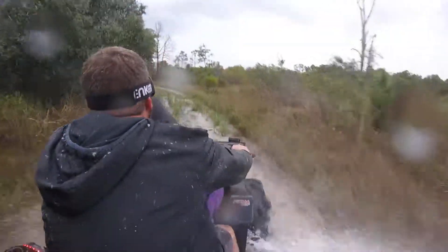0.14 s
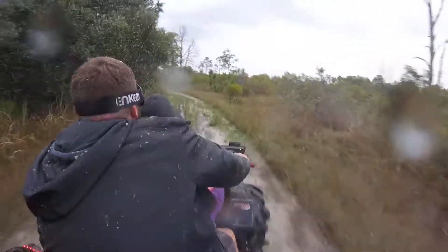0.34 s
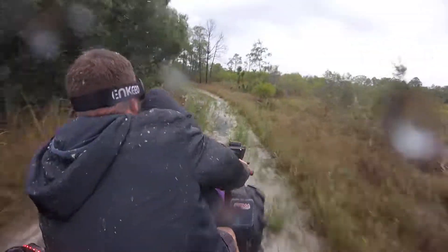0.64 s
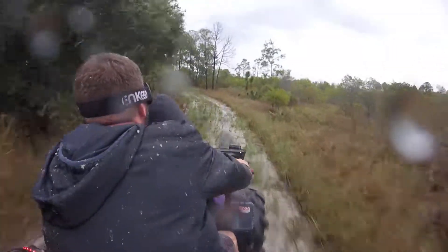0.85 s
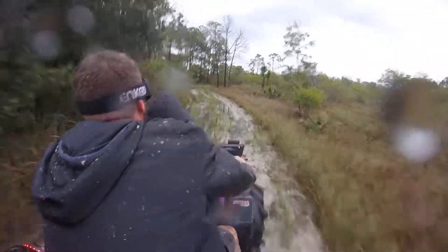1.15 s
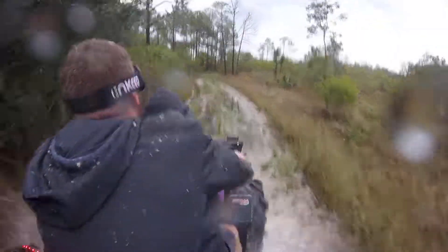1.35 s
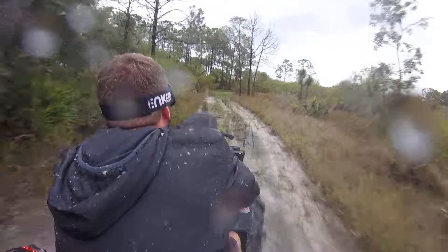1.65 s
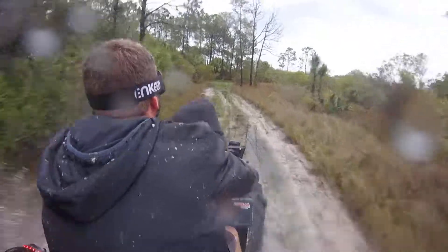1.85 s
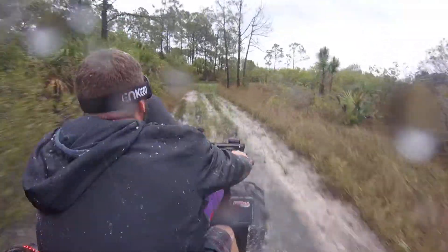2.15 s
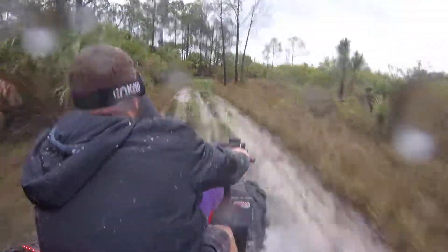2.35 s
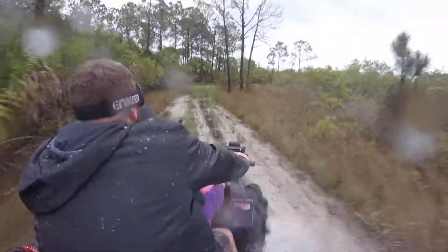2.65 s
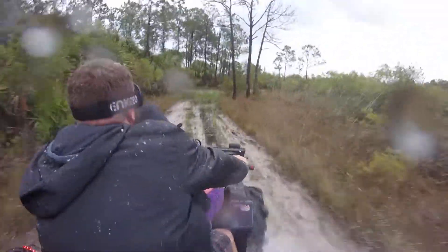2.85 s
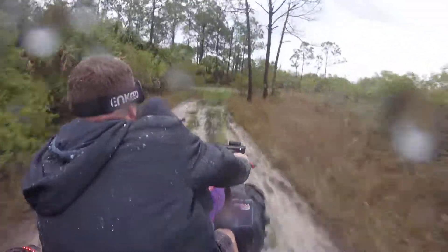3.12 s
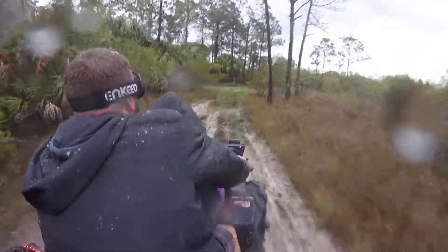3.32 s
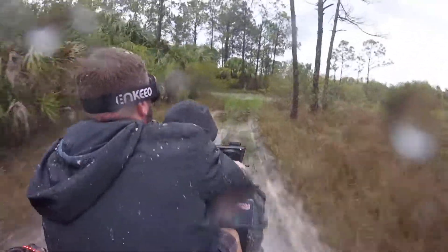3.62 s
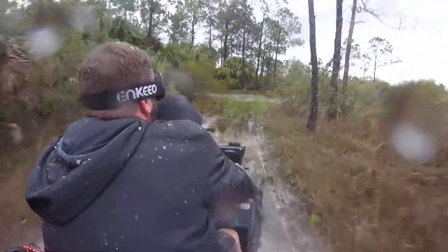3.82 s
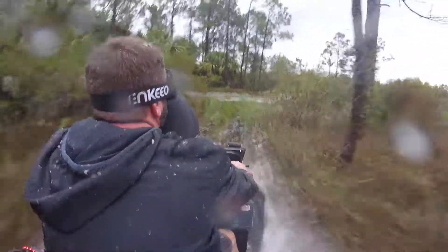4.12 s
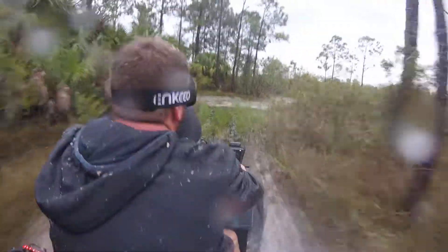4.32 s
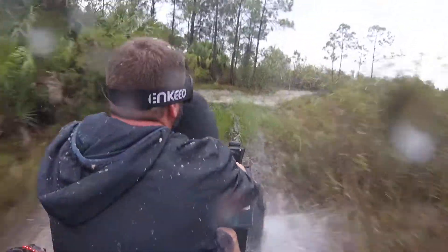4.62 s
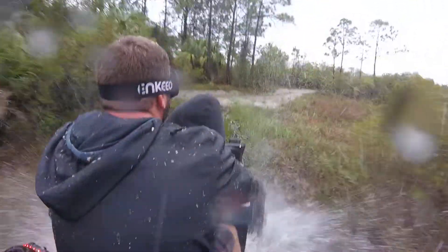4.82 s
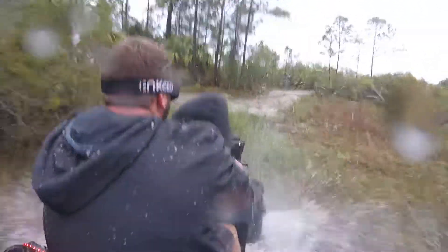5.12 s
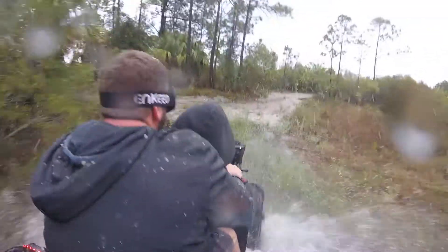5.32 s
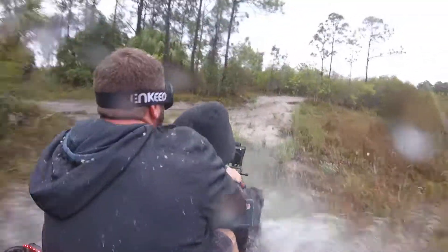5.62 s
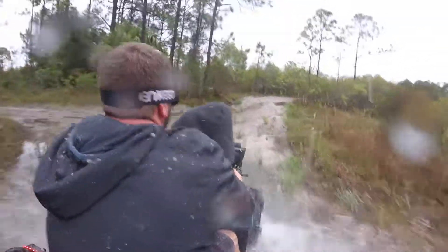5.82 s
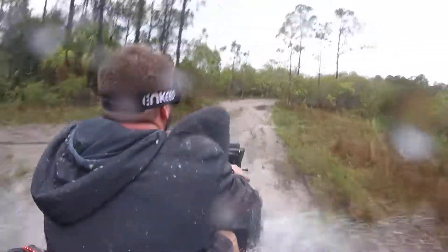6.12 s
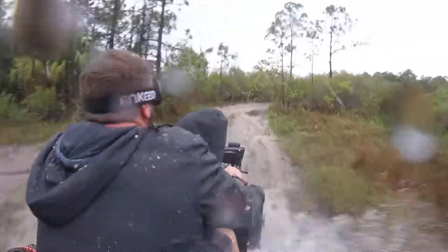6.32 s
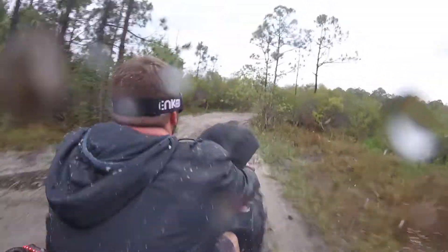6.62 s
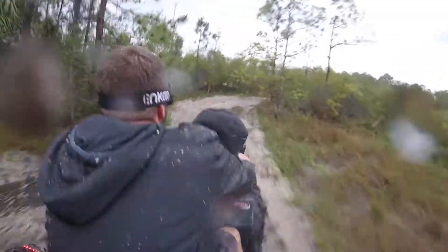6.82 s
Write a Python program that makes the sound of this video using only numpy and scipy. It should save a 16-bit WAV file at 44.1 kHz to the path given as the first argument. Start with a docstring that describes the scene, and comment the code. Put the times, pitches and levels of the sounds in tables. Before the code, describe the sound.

A one-cylinder quad bike drives along a flooded track, heard close up from its rear. The exhaust barks and booms with each press of the throttle, over rattling parts, rumbling panels and a light hiss of spray. Wind buffets the microphone throughout, while drops tick and mud thuds. Midway the engine sags twice, with faint belt chirps, two exhaust pops and a clink, then revs up again.

```python
"""A quad bike with a one-cylinder four-stroke engine on a flooded sand track, heard from its rear rack.
From the start the exhaust barks and booms, panels rumble and tyres spray, all louder with each press of
the throttle, while the transmission rattles and wind buffets the camera. Soon drops tick on its housing,
mud slaps the panels and the treble crackles. After 3 s the engine slows and its slack belt chirps.
Near 4.2 s the bike runs into deep water; the exhaust pops twice; the belt snatches as the engine revs."""
import sys
import numpy as np
from scipy import signal
from scipy.fft import rfft, irfft, next_fast_len
from scipy.io import wavfile
from scipy.ndimage import uniform_filter1d, map_coordinates

SR = 44100
rng = np.random.default_rng(int(sys.argv[2]) if len(sys.argv) > 2 else 0)


def wav_out(sig):
    """Save sig, one row per channel (or a flat mono array), as 16-bit PCM at SR to the path in sys.argv[1]."""
    wavfile.write(sys.argv[1], SR, np.round(np.clip(np.atleast_2d(sig).T, -1, 1) * 32767).astype(np.int16))


N = 306936
T = np.arange(N) / SR


def undb(db):
    """Turn decibels into a number to multiply by."""
    return 10 ** (np.asarray(db) / 20)


def unit(x):
    """Scale a sound to an average strength (rms) of 1."""
    return x / np.sqrt(np.mean(x ** 2))


def noise():
    """White noise: an even hiss."""
    return rng.standard_normal(N)


def wander(per_s):
    """A smooth random drift with a spread of 1."""
    hold = int(SR / per_s)
    steps = np.repeat(rng.standard_normal(N // hold + 1), hold)
    return unit(uniform_filter1d(uniform_filter1d(steps, hold), hold)[:N])


def swells(rows, rise_s, fall_s):
    """A level in dB that rests at 0, moves to each row's level while it lasts, and falls back."""
    gain = np.ones(N)
    for start, end, db in rows:
        rise = 1 - np.exp(-np.clip(T - start, 0, end - start) / rise_s)
        fall = np.exp(-np.maximum(T - end, 0) / fall_s)
        gain += (undb(db) - 1) * rise * fall
    return 20 * np.log10(np.maximum(gain, 1e-3))


def keep_band(x, hz, kind, order=2):
    """Keep what is below ("low") or above ("high") a frequency; a higher order cuts more sharply."""
    return signal.sosfilt(signal.butter(order, hz, kind, fs=SR, output="sos"), x)


def colour(x, spectrum):
    """Make each frequency louder or softer, following a table."""
    hz, db = np.transpose(spectrum)
    f = np.maximum(np.fft.rfftfreq(N, 1 / SR), 1)
    return irfft(rfft(x) * undb(np.interp(np.log(f), np.log(hz), db)), N)


def ring(x, modes):
    """Make an object ring at its own notes (modes); narrower ones ring longer."""
    s = 1j * np.fft.rfftfreq(16384, 1 / SR)
    # neighbouring notes swing in opposite directions
    gain = sum((-1) ** k * undb(db) * s * width / (s * s + s * width + hz * hz)
               for k, (hz, width, db) in enumerate(modes))
    # minimum phase: all notes start together at the push
    cepstrum = irfft(np.log(np.abs(gain) + 1e-4))
    half = len(cepstrum) // 2
    folded = np.r_[cepstrum[0], 2 * cepstrum[1:half]]
    response = irfft(np.exp(rfft(folded, 2 * half)))[:half]
    size = 2 * next_fast_len((N + SR // 2) // 2)
    return irfft(rfft(x, size) * rfft(response, size), size)[:N]


def drifting_ring(x, modes, spread, per_s):
    """Ringing that wanders between a slightly lower and a slightly higher tuning."""
    low, high = (ring(x, np.array(modes) * [1 + side * spread / 2, 1, 1]) for side in (-1, 1))
    blend = .5 + .5 * np.tanh(wander(per_s))
    return (1 - blend) * low + blend * high


def echo(x, echoes):
    """Repeating echoes that spread a pulse in time and leave its tone alone."""
    f = np.fft.rfftfreq(N, 1 / SR)
    spectrum = rfft(x)
    for delay_s, share in echoes:
        lag = np.exp(-2j * np.pi * f * delay_s)
        direct = np.sqrt(1 - share)
        spectrum = spectrum * (direct + lag) / (1 + direct * lag)
    return irfft(spectrum, N)


def clicks(times, sizes):
    """One click at each time."""
    x = np.zeros(N)
    np.add.at(x, np.clip((times * SR).astype(int), 0, N - 1), sizes)
    return x


def burst(pulses, fade_s):
    """Noise that starts at each pulse and dies away."""
    return noise() * signal.lfilter([1], [1, -np.exp(-1 / (SR * fade_s))], pulses)


def blows(times, peaks_db, modes, fade_s, scrape, pitch=1):
    """Each blow is a push and a short noisy scrape that make an object ring."""
    out = np.zeros(N)
    response = ring(np.r_[1, np.zeros(N - 1)], modes)[:SR // 8]
    age = T[:SR // 4]
    for time, db, fade, ratio in np.broadcast(times, peaks_db, fade_s, pitch):
        force = scrape * rng.standard_normal(len(age)) * np.exp(-age / fade)
        force[0] += 1
        retuned = map_coordinates(response, [ratio * np.arange(len(response))])
        start = int(time * SR)
        hit = signal.fftconvolve(force, retuned)[:N - start]
        out[start:start + len(hit)] += hit * undb(db) / np.abs(hit).max()
    return out


# engine speed, cruising, then sagging twice and revving: (time [s], firings a second [Hz])
ENGINE_SPEED = [(0, 45.89), (.2, 45.36), (.29, 47.02), (.39, 44.66), (.5, 46), (.65, 45.02), (.76, 47.98),
                (.84, 46.54), (.93, 47.52), (1.03, 46.77), (1.14, 48), (1.2, 47.7), (1.28, 49.05),
                (1.42, 48.08), (1.52, 49.97), (1.7, 49.53), (1.78, 48.54), (1.88, 49.21), (2.06, 48.7),
                (2.17, 47.07), (2.28, 47.85), (2.39, 46.46), (2.48, 46.43), (2.55, 45.96), (2.65, 46.35),
                (2.77, 43.93), (2.85, 46.75), (2.97, 45.39), (3.17, 45.7), (3.28, 39.6), (3.46, 35.4),
                (3.52, 37.6), (3.64, 44.83), (3.79, 43.14), (3.97, 42.56), (4.26, 37.75), (4.5, 36.6),
                (4.63, 49.1), (4.85, 46), (4.94, 51.6), (5.05, 49.3), (5.14, 44.5), (5.29, 47.23),
                (5.41, 48.76), (5.55, 49.72), (5.68, 51.81), (5.82, 50.13), (5.93, 52.64), (6.07, 51.1),
                (6.21, 53.11), (6.29, 51.63), (6.52, 52.99), (6.7, 51.34), (6.81, 53.01), (6.96, 50.38)]
def firing_times():
    """The moments when the exhaust valve opens, once every two turns of the engine."""
    speed_hz = np.interp(T, *np.transpose(ENGINE_SPEED))
    cycles = .555 + np.cumsum(speed_hz) / SR  # starts partway through a cycle
    return np.interp(np.arange(1, int(cycles[-1]) + 1), cycles, T)


def firings(scatter_db, jitter_s):
    """One pulse for each firing, each a little different in strength and timing."""
    times = firing_times()
    size, slip = rng.standard_normal((N // 500, 2))[:len(times)].T
    return clicks(times + jitter_s * slip, undb(scatter_db * size))


# presses of the thumb throttle: (start [s], end [s], load above a closed throttle [dB])
THROTTLE_PRESSES = [(.02, .17, 13), (.21, .73, 17), (.76, .82, 13.5), (.82, .96, 18), (1.01, 1.25, 16),
                    (1.33, 1.47, 5), (1.64, 1.69, 8), (1.69, 1.91, 17), (1.98, 2.17, 16), (2.24, 2.46, 14),
                    (2.52, 2.68, 9.5), (2.7, 2.84, 14.5), (2.87, 2.95, 9.5), (2.95, 3.15, 15),
                    (3.5, 3.58, 17), (3.58, 3.78, 16.5), (3.81, 3.95, 15.5), (4.52, 4.61, 15),
                    (4.85, 4.98, 15.5), (5.03, 5.12, 7), (5.22, 5.29, 9.5), (5.3, 5.68, 14.5),
                    (5.73, 5.99, 14.5), (6.08, 6.23, 14), (6.3, 6.46, 12.5), (6.62, 6.92, 11)]
def throttle():
    """The load, or how hard the engine works, in dB: it builds with each press and then dies away."""
    return swells(THROTTLE_PRESSES, rise_s=.022, fall_s=.039)


# the pulse bounces between the pipe's bends: (delay [s], share sent back [0 to 1])
BEND_ECHOES = [(.00062, 0.11), (.0021, 0.25), (.0047, 0.12)]
# notes of the exhaust pipe: (pitch [Hz], width [Hz], level [dB])
PIPE_NOTES = [(415, 57, 4), (432.8, 89, 2.5), (591.6, 12, -5), (652.8, 19.8, -1.5), (717.3, 56.6, -3.5),
              (838.6, 24, -5), (990, 51.4, -6.5), (1126, 34, -9), (1250, 21, 0), (1424, 154, -3.5),
              (1610, 76, -1), (1671, 107, -5.5), (1830, 140, -6.5), (1957, 54, -1.5), (2196, 180, -4),
              (2478, 260, -6.5), (2536, 116, -5.5), (2800, 46, -12), (3165, 220, -13), (3460, 110, -10),
              (3880, 60, -31), (4000, 180, -21), (4600, 1500, -40), (5770, 130, -29), (5470, 300, -38)]
def pipe_bark(pulses, gas_pulses):
    """The valve opens with a crack and gas rushes after it; both make the pipe ring."""
    gas = keep_band(unit(burst(gas_pulses, fade_s=.0058)), 690, "high", order=1)
    crack = keep_band(unit(echo(pulses, BEND_ECHOES)), 870, "low", order=1)
    force = keep_band(crack, 3000, "low", order=3) + undb(-6.5) * gas
    pipe = drifting_ring(force, PIPE_NOTES, spread=.0076, per_s=6)  # the gas's heat shifts the notes
    return unit(keep_band(pipe, 370, "high", order=4))


# notes of the valve gear: (pitch [Hz], width [Hz], level [dB])
VALVE_NOTES = [(3060, 410, 3.5), (5540, 720, -20.5)]
def valve_tick(pulses):
    """The parts that move the valve tick just before each crack."""
    early = np.roll(pulses, -int(.0054 * SR))
    return unit(ring(burst(early, fade_s=.0013), VALVE_NOTES))


# tone of the escaping gas: (frequency [Hz], level [dB])
GAS_TONE = [(1500, -25), (2900, -8), (3400, 3), (4000, -3), (4600, -5), (5900, -2), (6800, -11),
            (8000, -15), (10000, -28), (15000, -40)]
def gas_hiss(gas_pulses):
    """Each puff of gas leaves the pipe's mouth with a gritty hiss."""
    puffs = burst(gas_pulses, fade_s=.014)
    grit = undb(3 * wander(per_s=1500))
    return unit(colour(puffs * grit, GAS_TONE))


# low notes of the silencer: (pitch [Hz], width [Hz], level [dB])
SILENCER_NOTES = [(46.6, 9.5, -3), (80, 16.8, 3.5), (99.8, 8.76, 9), (202, 21, -12.5), (265.4, 12, -9.5)]
def silencer_boom(pulses):
    """The pulses make the silencer ring with a deep, wavering boom."""
    boom = keep_band(ring(pulses, SILENCER_NOTES), 410, "low", order=4)
    return unit(boom * undb(.9 * wander(per_s=14)))


def exhaust(load_db):
    """The same firings drive bark, tick, hiss and boom; all grow louder with load."""
    pulses = firings(scatter_db=.8, jitter_s=.00003)
    gas_pulses = np.roll(pulses, int(.0005 * SR))  # the gas comes just after the crack
    rasp = pipe_bark(pulses, gas_pulses)
    rasp += undb(-28.5) * valve_tick(pulses)
    rasp += undb(-18.5) * gas_hiss(gas_pulses)
    return rasp * undb(-50.5 + load_db) + silencer_boom(pulses) * undb(-37.5 + .83 * load_db)


# notes of the transmission's case: (pitch [Hz], width [Hz], level [dB])
CASE_NOTES = [(428, 40, 6.5), (664, 30, -19), (980, 650, -31), (1270, 140, -2.5), (1390, 60, -2.5),
              (1890, 110, -3), (2240, 460, -11.5), (3100, 95, -18.5), (4150, 130, -32), (5900, 260, -40.5)]
def transmission():
    """Loose parts clash, bounce and rub once a cycle, ringing their case; louder once they are wet."""
    deep_water_s, soak_s = 4.2, .44
    wet = np.clip((T - deep_water_s) / soak_s, 0, 1)
    clash = firings(scatter_db=1.5, jitter_s=.00008)
    bounce = np.roll(clash, int(.0023 * SR))
    rubbing = burst(bounce, fade_s=.012)
    force = unit(clash + undb(-11) * bounce) + undb(4.5) * unit(rubbing)
    case = keep_band(ring(force, CASE_NOTES), 340, "high", order=4)
    return unit(case) * undb(-48 + 4 * wet)


# notes of the plastic panels: (pitch [Hz], width [Hz], level [dB])
PANEL_NOTES = [(145, 116, -1), (164.3, 28, 3.5), (248.2, 27, 4), (281.4, 41, -1.5), (306, 160, -55)]
# rutted stretches of track: (start [s], end [s], change in rumble [dB])
TRACK_RUTS = [(0.3, 0.47, 0.5), (3.56, 3.68, 4.5), (3.82, 3.97, 7.5), (4.03, 4.25, 12.5), (4.44, 4.6, -4),
              (4.72, 4.8, 14.5), (5.0, 5.25, 9), (5.4, 5.9, 2.5)]
def panel_rumble(load_db):
    """Knobbly tyres on the rough track and the shaking engine keep the plastic panels rumbling."""
    jolts = noise() * undb(wander(per_s=30))
    shake = firings(scatter_db=2.5, jitter_s=.0002)
    force = unit(jolts) + undb(-2) * unit(shake)
    panels = drifting_ring(force, PANEL_NOTES, spread=.07, per_s=7)  # flexing shifts the notes
    level_db = -43 + .58 * load_db + swells(TRACK_RUTS, rise_s=.024, fall_s=.024)
    return unit(keep_band(panels, 287.4, "low", order=6)) * undb(level_db)


# tone of the wind: (frequency [Hz], level [dB])
WIND_TONE = [(10, -25), (20, -7.5), (31, -4), (45, -10), (62, -22), (85, -21.5), (125, -34.5), (200, -42),
             (400, -55.5), (1000, -86)]
# lulls in the wind: (start [s], end [s], change in level [dB])
WIND_LULLS = [(1.62, 1.72, -8.5), (2.25, 2.31, -9.5), (2.93, 2.99, -6.5), (3.13, 3.19, -3),
              (3.62, 3.67, -12), (5.91, 5.96, -10)]
def wind():
    """Swirls of air push on the camera one after another, uneven in length but similar in strength."""
    swirls = unit(colour(noise(), WIND_TONE))
    strength = np.sqrt(uniform_filter1d(swirls ** 2, int(.07 * SR)))
    evened = unit(swirls / strength ** 1.63)
    buffet_db = .74 * wander(per_s=4.3)
    lull_db = swells(WIND_LULLS, rise_s=.0051, fall_s=.0051)
    return evened * undb(-12.5 + buffet_db + lull_db)


# tone of the spray: (frequency [Hz], level [dB])
SPRAY_TONE = [(300, -20), (700, -2), (1400, 0), (2200, -1), (2900, -5), (3400, 1), (4500, -6), (5900, -3),
              (6800, -12), (8000, -15), (10000, -27), (15000, -40)]
def tyre_spray(load_db):
    """Water flung off the tyres makes a flickering hiss that grows with load."""
    hiss = colour(noise() * undb(2 * wander(per_s=25)), SPRAY_TONE)
    return unit(hiss) * undb(-63.5 + .56 * load_db)


# notes of the camera housing: (pitch [Hz], width [Hz], level [dB])
HOUSING_NOTES = [(1350, 220, -9), (1980, 350, -8), (2600, 250, -15), (3417, 210, 0), (4650, 400, -17),
                 (5350, 350, -10), (7400, 1200, -25), (11300, 1800, -28)]
def fine_droplets():
    """Tiny droplets in the spray patter on the housing at random."""
    when, softness = rng.random((600, 2)).T
    taps = clicks(when * T[-1], undb(-10 * softness))
    return unit(ring(taps, HOUSING_NOTES)) * undb(-58.5)


# sharp ticks: (time [s], level [dB], pitch [ratio])
SHARP_TICKS = [(0.5507, -29.5, 1.2), (1.0472, -16.5, 0.96), (1.265, -22, 1), (1.458, -31, 2.1),
               (1.508, -28, 0.92), (1.546, -30.5, 0.96), (1.8529, -28, 1), (2.7917, -9, 0.96),
               (4.3697, -33.5, 1.02)]
def sharp_ticks():
    """Drops on the housing and a few brief microphone crackles, all with the housing's notes."""
    times, levels_db, pitches = np.transpose(SHARP_TICKS)
    return blows(times, levels_db, HOUSING_NOTES, fade_s=.0014, scrape=.1, pitch=pitches)


# water and mud landing: (time [s], level [dB], fading time [s], pitch [ratio])
MUD_HITS = [(1.336, -22.5, 0.0042, 1.03), (1.724, -22, 0.066, 1.09), (2.354, -21.5, 0.0076, 0.99),
            (3.073, -25.5, 0.024, 1.23), (3.22, -18.5, 0.027, 0.99), (3.626, -22, 0.026, 1.04),
            (3.86, -24, 0.027, 1.18), (4.159, -20, 0.055, 0.89), (4.428, -24, 0.074, 1.03),
            (4.485, -21.5, 0.057, 1.143), (4.525, -18, 0.018, 1.12), (4.569, -16, 0.011, .96)]
# notes of a slapped panel: (pitch [Hz], width [Hz], level [dB])
SLAP_NOTES = [(240, 20.7, 14), (327, 32, -13.5), (395, 52, -37.5)]
def mud_slaps():
    """Water and mud splatter against the panels with dull thuds."""
    times, levels_db, fades_s, pitches = np.transpose(MUD_HITS)
    slaps = blows(times, levels_db, SLAP_NOTES, fades_s, scrape=.96, pitch=pitches)
    return keep_band(slaps, 450, "low", order=4)


# brief crackles: (time [s], level [dB])
CRACKLE_HITS = [(1.351, -36.5), (1.436, -35), (1.459, -39), (1.472, -38), (1.561, -40), (1.572, -37),
                (3.104, -35), (3.249, -35), (3.396, -38.5), (3.765, -37), (4.078, -36.5), (4.45, -34.5),
                (5.011, -36), (5.12, -41), (5.242, -37), (5.267, -53), (5.877, -40), (6, -35.5),
                (6.236, -39), (6.473, -34)]
# their bright tone: (pitch [Hz], width [Hz], level [dB])
CRACKLE_TONE = [(3500, 1100, -3), (5600, 2700, -3.5), (7650, 3300, -5), (11200, 1700, -7)]
def crackles():
    """Very short bursts of noise crackle in the treble."""
    return blows(*np.transpose(CRACKLE_HITS), CRACKLE_TONE, fade_s=.004, scrape=1)


# quieter moments: (start [s], end [s], change in level [dB])
LEVEL_DIPS = [(1.56, 1.65, -1), (3.42, 3.48, -2.5), (4.99, 5.03, -3), (6.0, 6.07, -3.5), (6.49, 6.58, -5)]
def dipped(sound):
    """The level dips briefly now and then."""
    return sound * undb(swells(LEVEL_DIPS, rise_s=.0074, fall_s=.0074))


# spells when the belt is slack: (start [s], end [s], level [dB], delay after each firing [s])
SLACK_SPELLS = [(3.22, 3.48, -37.5, 0.0087), (4.17, 4.357, -37, 0.0072), (4.63, 4.877, -30.5, 0.0062),
                (4.88, 4.987, -34.5, 0), (5.0, 5.228, -32.5, 0.0047)]
# tones in one chirp: (pitch [Hz], level [dB])
CHIRP_TONES = [(428, -2.5), (1315, -2), (1830, -8), (2110, -15), (3210, -17)]
def belt_chirps():
    """When the wheels drive the engine, the slack belt slips and chirps once a cycle."""
    chirp_s, pitch_spread, scatter_db = .015, .011, 1.6
    out, times = np.zeros(N), firing_times()
    age = T[:int(chirp_s * SR)]
    swell = np.sin(np.pi * age / chirp_s) ** 2
    chance = rng.standard_normal((len(times), 1 + len(CHIRP_TONES)))
    for start, end, level_db, delay_s in SLACK_SPELLS:
        for k in np.flatnonzero((times >= start) & (times < end)):
            size, *detunes = chance[k]
            tones = sum(undb(db) * np.sin(2 * np.pi * hz * (1 + pitch_spread * detune) * age)
                        for (hz, db), detune in zip(CHIRP_TONES, detunes))
            i = int((times[k] + delay_s) * SR)
            out[i:i + len(age)] += swell * tones * undb(level_db + scatter_db * size)
    return out


# pops in the exhaust: (time [s], level [dB])
EXHAUST_POPS = [(4.2181, -24.5), (4.6602, -19)]
# notes of the pipe after a pop: (pitch [Hz], width [Hz], level [dB])
POP_NOTES = [(1080, 97, -10), (1610, 230, 2), (2000, 180, 3), (2190, 180, 4), (2700, 480, -6),
             (3280, 170, 0.5), (4600, 600, -19), (5550, 610, -19.5)]
def exhaust_pops():
    """The exhaust pops twice with the throttle closed, ringing the pipe."""
    return blows(*np.transpose(EXHAUST_POPS), POP_NOTES, fade_s=.003, scrape=.3)


# the belt catching: (time [s], level [dB])
SNATCH_HIT = [(4.8463, -14.5)]
# notes it sets ringing: (pitch [Hz], width [Hz], level [dB])
SNATCH_NOTES = [(1330, 63, 5), (1830, 190, -10), (2470, 260, -24), (3410, 77, -9), (5400, 900, -32)]
def belt_snatch():
    """The belt snaps tight with a clink as the throttle opens."""
    return blows(*np.transpose(SNATCH_HIT), SNATCH_NOTES, fade_s=.003, scrape=.08)


def scene():
    """Engine, track, water and wind, all close by; the throttle drives exhaust, rumble and spray."""
    load_db = throttle()
    engine = exhaust(load_db) + transmission() + belt_chirps()
    ride = panel_rumble(load_db) + tyre_spray(load_db) + fine_droplets()
    hits = sharp_ticks() + mud_slaps() + crackles() + exhaust_pops() + belt_snatch()
    return (dipped(engine + ride) + wind() + hits)[None]


def record(dry):
    """The housing dulls the treble; the biggest swings are rounded and crackle faintly; the top is cut."""
    end_fades = np.clip(np.minimum(T, T[-1] - T) / .008, 0, 1)
    muffled = keep_band(dry[0] * end_fades, 5670, "low")
    rounded = np.tanh(.72 * muffled) / .85
    overload = np.clip(np.abs(rounded) - .36, 0, .05)
    fizz = colour(noise(), [(500, -8.5), (3000, -15.5), (8000, 5), (11000, -9), (15000, -27)])
    crackle = undb(-29.5) * overload * fizz
    top_cut = signal.ellip(8, .2, 70, 15800, fs=SR, output="sos")
    return signal.sosfilt(top_cut, rounded + crackle)[None]


dry = scene()
out = record(dry)
wav_out(out)
```